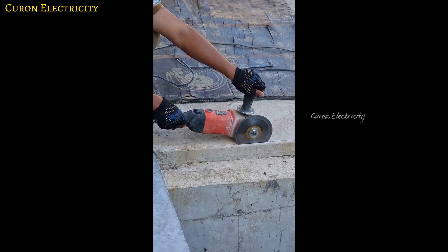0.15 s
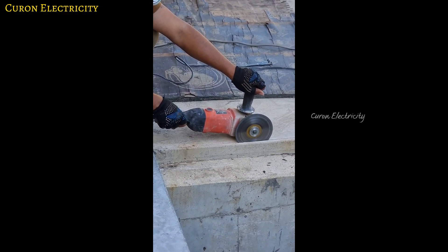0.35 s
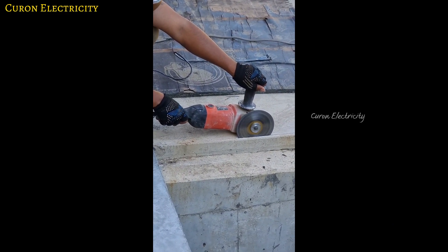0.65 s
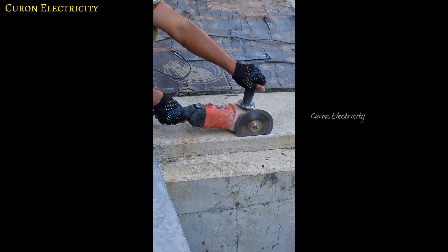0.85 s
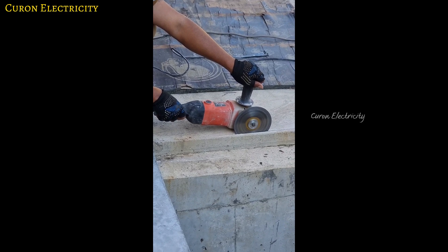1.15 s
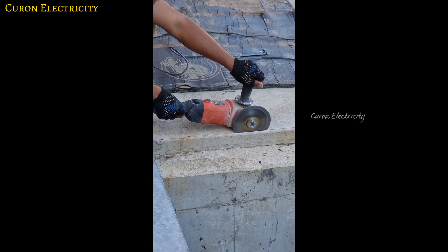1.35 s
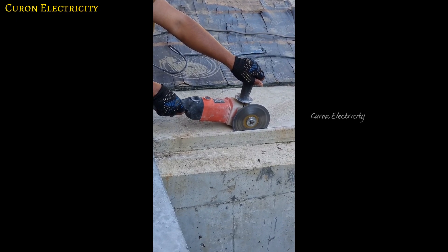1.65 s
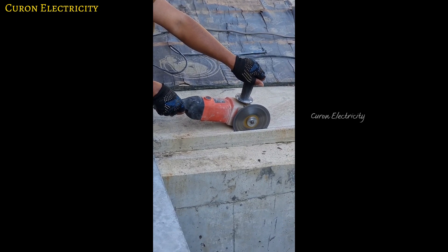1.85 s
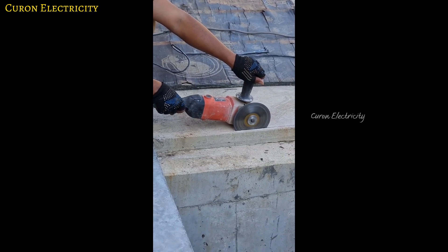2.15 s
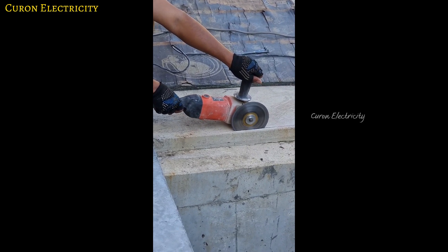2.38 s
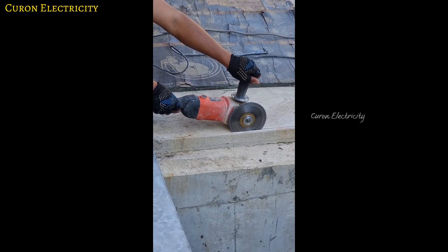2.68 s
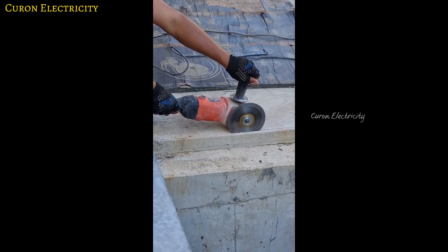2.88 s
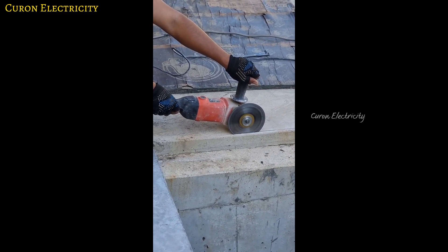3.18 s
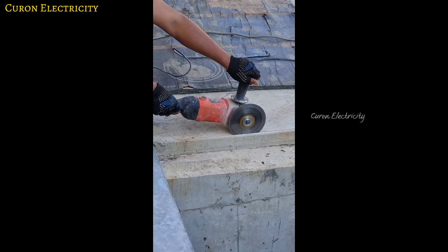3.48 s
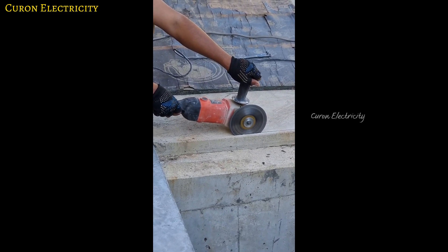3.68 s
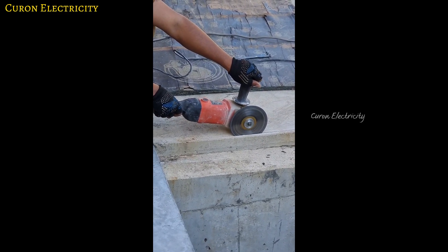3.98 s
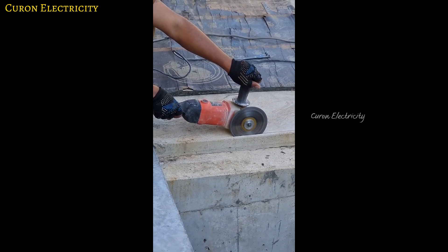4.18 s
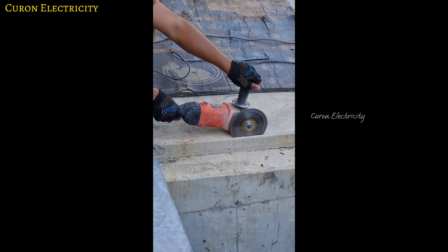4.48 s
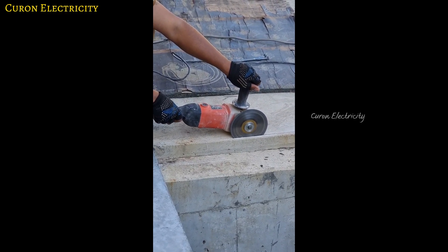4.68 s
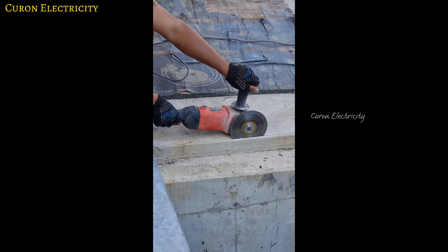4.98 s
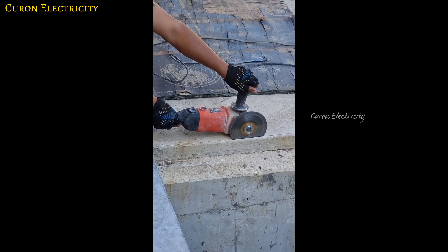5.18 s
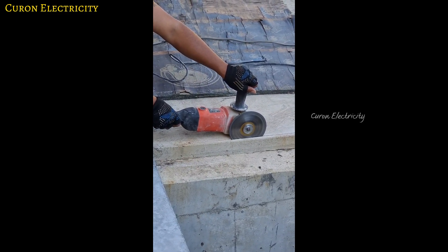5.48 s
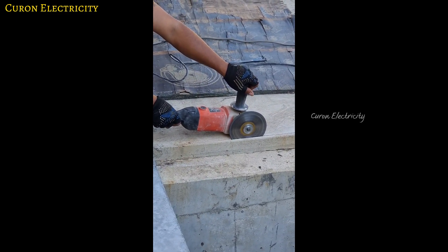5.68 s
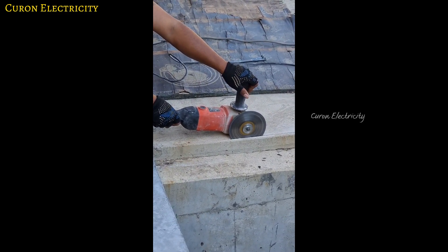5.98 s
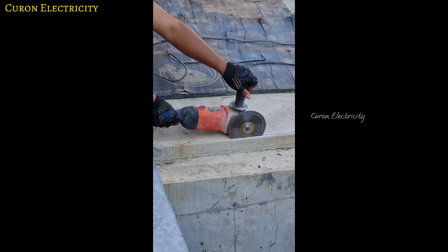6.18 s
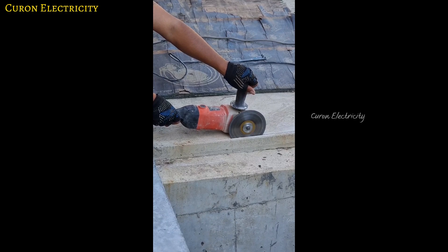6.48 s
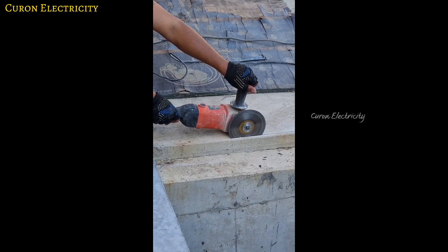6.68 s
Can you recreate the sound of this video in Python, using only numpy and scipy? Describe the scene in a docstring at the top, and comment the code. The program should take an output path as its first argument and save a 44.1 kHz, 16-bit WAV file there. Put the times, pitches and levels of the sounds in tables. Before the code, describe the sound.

A steady, piercing grind of a steel disc on concrete runs from start to end, with rough guard rattle, dull slab scraping and faint motor drone. The rotation sags and recovers a little, ending faster. Thin squeals flick out briefly, mainly in the first half. Close outdoor stereo pickup, short reflections from hard surfaces, light wind with early low thumps, and a quiet distant hum.

```python
"""From the start, an angle grinder cuts a concrete slab outdoors, close to two microphone ports, over wind and hum.
Noise shaped by contact pressure, partly alike on every turn, rings the slab, housing, guard and disc as resonators;
tones locked to the spindle follow its speed. Disc modes sing briefly, and between 1.2 and 2.2 s eddies thump the ports.
Near 4.1 s the treble swings right; meanwhile the hiss sinks and the breeze dies down."""
import sys
import numpy as np
from scipy import signal
from scipy.fft import rfft, irfft
from scipy.io import wavfile
from scipy.ndimage import uniform_filter1d

SR = 44100
rng = np.random.default_rng(int(sys.argv[2]) if len(sys.argv) > 2 else 0)


def wav_out(sig):
    """Save sig, one row per channel (or a flat mono array), as 16-bit PCM at SR to the path in sys.argv[1]."""
    wavfile.write(sys.argv[1], SR, np.round(np.clip(np.atleast_2d(sig).T, -1, 1) * 32767).astype(np.int16))


N = 301644
TIME = np.arange(N) / SR
BINS = np.fft.rfftfreq(N, 1 / SR)
SIDES = np.array([[.5], [-.5]])  # left and right halves of a difference between the ports

# speed of the spindle, which sags under load: (time [s], speed [turns/s])
SPINDLE = [(0, 79), (.22, 79.7), (.45, 84), (.7, 86.4), (.88, 86.2), (1.05, 87.5), (1.6, 89.3), (1.9, 91.8),
           (2.07, 94.6), (2.6, 87.4), (3.05, 87.2), (3.28, 85), (3.5, 88), (3.85, 89.5), (4.15, 88.5),
           (4.46, 85), (4.7, 88), (5.15, 91.6), (5.45, 91.6), (5.8, 96.5), (6.05, 97.6), (6.6, 97.3),
           (6.84, 96)]


def amp(db):
    """The decibel is logarithmic: 20 dB is a factor of ten in amplitude."""
    return 10 ** (np.asarray(db) / 20)


def curve(rows, order=1):
    """Linear interpolation in time of one table column, at every sample."""
    rows = np.asarray(rows)
    return np.interp(TIME, rows[:, 0], rows[:, order])


def spectrum(rows, order=1):
    """Interpolation over log frequency of one table column, at every bin."""
    rows = np.asarray(rows)
    return np.interp(np.log(BINS + 1), np.log(rows[:, 0]), rows[:, order])


def drift(rate_hz):
    """Low-passed Gaussian noise: a smooth complex modulation of power 1, changing about rate_hz times a second."""
    count = 4096
    hz = np.fft.fftfreq(count, N / SR / count)
    noise = rng.standard_normal(count) + 1j * rng.standard_normal(count)
    smooth = np.fft.ifft(np.fft.fft(noise) * np.exp(-(hz / rate_hz) ** 2))
    return np.interp(np.linspace(0, count - 1, N), np.arange(count), smooth / smooth.std())


def step(at_s, time_constant_s):
    """Logistic transition from 0 to 1, half complete at at_s."""
    return .5 + .5 * np.tanh((TIME - at_s) / (2 * time_constant_s))


def swelling(base_db, swells):
    """Addition of powers: the gain of a base level with Gaussian swells on top."""
    power = amp(base_db) ** 2
    for at_s, db, half_s in swells:
        power = power + amp(db) ** 2 * np.exp(-((TIME - at_s) / half_s) ** 2)
    return np.sqrt(power)


def rim_pattern(turns, wear_hz=4.9, count=42):
    """Periodicity: grit meeting the stone every turn gives shaft orders, which change as it wears."""
    turn = np.exp(2j * np.pi * turns)
    wave, pattern = turn ** 4, np.zeros(N)
    for _ in range(count):  # orders 5 to 46
        wave = wave * turn
        pattern += (wave * drift(wear_hz)).real
    return pattern * np.sqrt(4 * curve(SPINDLE) / SR)  # as dense as unit white noise


def bite(turns, wobble=.03, segments=.05, chatter_db=.15, chatter_hz=45.):
    """Modulated contact pressure: a wobble once a turn, strikes of twelve segments, and chatter in the groove."""
    angle = 2 * np.pi * turns
    strikes = np.cos(12 * angle)
    return (1 + wobble * np.cos(angle) + segments * strikes) * amp(chatter_db * drift(chatter_hz).real)


def uptake(pressure, level_db, flutter_db, flutter_hz=32.8):
    """Excitation force: a part takes up the contact pressure unevenly, with a quick flutter."""
    return pressure * amp(level_db + flutter_db * drift(flutter_hz).real)


def ringing(modes):
    """Superposition of modal powers: the response of a set of resonances at the two ports."""
    hz, width, db, side_db, lead = np.transpose(modes)[:, :, None]
    power = amp(db) ** 2 / (1 + (2 * (BINS - hz) / width) ** 2) ** 2
    size = np.sqrt(amp(SIDES * side_db.T) ** 2 @ power)
    mean_lead = np.unwrap(np.angle((power * np.exp(1j * lead)).sum(0)))
    return size * np.exp(1j * SIDES * mean_lead)


def scrape(response, force, pattern, repeat):
    """Source and filter: fresh fractures and a share repeated each turn, coloured by what they shake."""
    # likeness of the sound at the two ports: (frequency [Hz], likeness [0 to 1])
    likeness = [(60, 1), (250, 1), (1300, 0.52), (2400, 1), (3200, 0.95), (4100, 0.83), (5400, 1),
                (6400, 0.2), (7800, 1), (8700, 0.73), (11500, 0), (13200, 0.65), (15700, 0.4)]
    fresh, stray = rfft(rng.standard_normal((2, N)) * force)
    share = np.clip(repeat, 0, 1) / (1 + (BINS / 3600) ** 8)  # the repetition is lost in the treble
    common = np.sqrt(1 - share) * fresh + np.sqrt(share) * rfft(pattern * force)
    same = np.clip(spectrum(likeness), 0, 1)
    alike = np.sqrt((1 + same) / 2) * common
    unlike = 2 * SIDES * np.sqrt((1 - same) / 2) * stray
    return irfft(response * (alike + unlike), N)


def vents(pattern):
    """Turbulent flow: air rushes steadily through the motor's vents."""
    # response of the vents: (frequency [Hz], gain before the force of 0.98 [dB])
    rush = [(20, -50), (55, -21.5), (120, -31.5), (200, -28), (320, -32.5), (420, -33), (530, -29.5),
            (680, -40), (1200, -58), (3000, -68)]
    return scrape(amp(spectrum(rush)), 0.98, pattern, repeat=0.085)


def slab(pattern, pressure, feed_db, follows=1.17):
    """Forced vibration: harder feed brings louder dull scraping of the slab."""
    # response of the slab: (frequency [Hz], gain before the force [dB])
    dull = [(400, -42), (760, -40.5), (920, -32.5), (1070, -33), (1300, -29.5), (1700, -29.5), (2700, -41),
            (3400, -71), (16000, -72)]
    return scrape(amp(spectrum(dull)), uptake(pressure, follows * feed_db, flutter_db=3.5), pattern, repeat=0.13)


def housing(pattern, pressure, feed_db, follows=0.69):
    """Modal resonance: snags on hard stones jolt the two lowest modes, while the feed drives the others."""
    # modes: (frequency [Hz], width at half amplitude [Hz], gain before the force [dB],
    # left over right [dB], lead of left [rad])
    modes = [(932, 113, -33, 1, 0.13), (990, 87, -39, -5, 0.13), (1586, 193, -15.5, -2.5, 0.88),
             (2017, 490, -19.5, 7, 0.2)]
    # snags of the rim: (time [s], jolt added to a steady 0 dB by power [dB], half length at 1/e power [s])
    snags = [(.08, 7, .13), (.6, 8, .07), (1.6, 4, .06), (2.3, 10, .07), (3.06, 11, .05), (3.19, 13, .04),
             (3.28, 16, .035), (3.6, 6, .12), (4.95, 3, .12)]
    low = scrape(ringing(modes[:2]), pressure * swelling(0, snags), pattern, repeat=0.22)
    force = uptake(pressure, follows * feed_db, flutter_db=2.5)
    return low + scrape(ringing(modes[2:]), force, pattern, repeat=0.23)


def flexing(x, share=.002, flex_hz=12.):
    """Frequency modulation: a part flexes under the hand, so its resonances wander by a small share."""
    at = np.arange(N)
    stray = share * drift(flex_hz).real
    path = at + np.cumsum(stray - stray.mean())
    return np.array([np.interp(path, at, port) for port in x])


def guard(pattern, pressure):
    """Modal resonance: the cut shakes the guard, whose close modes wander in pitch."""
    # modes: (frequency [Hz], width at half amplitude [Hz], gain before the force [dB],
    # left over right [dB], lead of left [rad])
    modes = [(2242, 116, -6.5, 0.4, 0.16), (2297, 168, -3.5, 0.4, 0.12), (2474, 260, -10.5, 0, 0.07)]
    # how strongly the cut shakes the guard: (time [s], level before flutter [dB])
    rattle = [(0, 3.3), (0.25, 3.2), (0.55, 1.3), (0.9, 2.1), (1.1, 1.1), (1.3, 2.2), (1.55, 0.5),
              (2.0, 2.9), (2.3, 1.5), (2.6, -0.5), (2.8, 2.3), (3.2, 2.0), (3.4, 0.4), (3.7, 1.0),
              (4.15, 0.7), (4.45, -1.7), (4.7, -1.9), (5.05, -4.1), (5.45, -1.3), (5.75, -1.8), (6.1, -1.5),
              (6.25, -2.6), (6.5, -0.3), (6.84, 0.3)]
    force = uptake(pressure, curve(rattle), flutter_db=1.37, flutter_hz=70.)
    return flexing(scrape(ringing(modes), force, pattern, repeat=0.3))


def grit_hiss(pattern, pressure, start_db=2.5, fade_db_per_s=0.99):
    """Fracture noise: breaking grit hisses over a broad band and sinks as the groove deepens."""
    # response of the hiss: (frequency [Hz], gain before the force [dB], left over right [dB])
    hiss = [(1400, -45, 0), (2400, -20, 0.3), (3000, -18.5, 0.7), (3450, -23.9, 0.8), (4600, -20, 2.2),
            (5600, -21.7, -2.3), (7000, -17.2, -0.8), (8500, -17.3, 4.0), (11100, -17.0, 2.4),
            (12500, -16.4, 2.9), (15750, -16.5, -4.8)]
    # phase between the ports: (frequency [Hz], lead of left [rad])
    leads = [(2500, 0.78), (3600, 1.7), (4300, 1.07), (5200, 19.7), (6400, 3.9), (7900, 23.2), (9000, 12.7),
             (11000, 12.2), (11800, 5.2), (12900, 6.3), (14400, 11), (15400, 6.4)]
    size = amp(spectrum(hiss) + SIDES * spectrum(hiss, order=2))
    response = size * np.exp(1j * SIDES * spectrum(leads))
    force = uptake(pressure, start_db - fade_db_per_s * TIME, flutter_db=2.5)
    return scrape(response, force, pattern, repeat=0.067)


def bearing_db(way):
    """Addition of powers: a constant light touch in one way, plus the spells of bearing harder."""
    # light touch before the disc's overall gain: (way: level [dB])
    light_touch = {"edge": -13, "free": -15, "flank": -10.5, "pinch": -15.5}
    # spells: (start [s], end [s], level before the disc's overall gain [dB],
    # time constant of the changeover [s], way)
    spells = [(-.5, 0.75, -5.5, .15, "free"), (-.5, .28, -5, .12, "flank"), (.18, 2.35, .3, 0.12, "edge"),
              (1.95, 2.14, -7, .06, "pinch"), (2.06, 4.85, -6, .12, "flank"),
              (2.44, 2.58, -3.5, .05, "flank"), (2.73, 3.74, 0.4, .12, "free"),
              (3.92, 4.88, -6, .1, "pinch"), (3.65, 4.4, -4.5, .11, "flank"),
              (4.85, 6.6, -0.1, 0.12, "pinch"), (6.58, 7.3, -5, 0.08, "flank"),
              (6.6, 7.3, -7, .08, "pinch")]
    power = amp(light_touch[way]) ** 2
    for start, end, db, change, kind in spells:
        if kind == way:
            power = power + amp(db) ** 2 * step(start, change) * (1 - step(end, change))
    return 10 * np.log10(power)


def disc(pattern, pressure, level_db=0.24):
    """Modal excitation: where the disc touches the groove decides which of its modes are fed."""
    # modes of the steel disc: (frequency [Hz], width at half amplitude [Hz], left over right [dB],
    # lead of left [rad], then gains before the force: on the leading edge [dB], free running [dB],
    # on the flank [dB], pinched [dB])
    modes = np.array([(2457, 380, -3.5, -0.1, -11.5, -18, -21, -18),
                      (3300, 160, 0.5, 2.3, -17.5, -20.0, -23.5, -24.5),
                      (3690, 260, 2.0, 2.9, -17.5, -15.0, -18.5, -22.0),
                      (3960, 210, 2.5, 2.8, -13.5, -14.0, -14.0, -19.0),
                      (4290, 170, 1.5, -2.8, -14.5, -11.5, -11.5, -15.0),
                      (4810, 170, -1.5, -1.2, -20.0, -16.0, -15.0, -15.0),
                      (5020, 190, -3.5, -0.2, -20.0, -14.0, -12.5, -16.0),
                      (5240, 160, 1.5, -0.0, -11.5, -15.0, -15.0, -15.0),
                      (5590, 480, 0.5, 0.1, -13.0, -28.5, -23.0, -11.5),
                      (5920, 170, -4.5, 0.9, -11.5, -14.5, -23.0, -10.0),
                      (6080, 180, -2.0, 1.6, -12.5, -6.0, -17.0, -14.5),
                      (6280, 440, 4.5, 1.1, -12.0, -10.0, -11.5, -10.5),
                      (6680, 170, -1.5, 0.5, -4.0, -7.0, -10.0, -4.5),
                      (7000, 240, -0.5, 1.1, -6.5, -12.0, -9.0, -10.5),
                      (7160, 310, -0.5, 1.1, -12.0, -7.5, -9.5, -15.5),
                      (7540, 200, 0.0, 1.9, -13.0, -7.0, -11.0, -10.0),
                      (7910, 240, 3.0, 1.8, -13.5, -13.0, -7.5, -12.0),
                      (8120, 220, 6.0, 2.1, -8.5, -18.0, -9.0, -7.5),
                      (8590, 130, 4.5, -1.7, -17.0, -9.5, -17.0, -13.5),
                      (9080, 290, 6.0, 0.1, -12.5, -14.0, -7.5, -15.5),
                      (9330, 140, 5.0, 0.7, -16.0, -13.5, -10.0, -13.0),
                      (9700, 490, 3.5, 1.0, -16.5, -13.0, -13.5, -11.0),
                      (10070, 280, 4.5, 1.9, -17.0, -20.5, -20.0, -16.5),
                      (10480, 240, 3.0, -0.5, -10.5, -9.0, -10.0, -15.0),
                      (10810, 240, 2.0, -0.0, -14.0, -16.5, -15.0, -17.0),
                      (11440, 280, 3.0, -2.6, -13.5, -12.0, -11.5, -11.0),
                      (11900, 270, 1.5, -2.5, -16.0, -16.5, -7.5, -9.5),
                      (12340, 280, -1.0, -1.3, -8.5, -10.0, -7.0, -7.0),
                      (12750, 500, -2.5, -0.6, -11.0, -13.0, -3.5, -10.5),
                      (12960, 220, -3.5, -0.5, -3.5, -11.0, -4.5, -2.0),
                      (13540, 300, -1.5, -0.3, -10.5, -9.5, -5.5, -11.5),
                      (13950, 180, -4.5, -0.2, -5.5, -6.0, -1.0, -7.5),
                      (14490, 240, -2.5, 0.3, -7.0, -8.0, -1.5, -6.5),
                      (15030, 170, -1.5, 1.4, -11.0, -8.5, -7.5, -11.0),
                      (15470, 220, -2.5, 2.2, -12.5, -13.0, -11.5, -10.0),
                      (15700, 210, -2.0, 2.3, -8.5, -5.0, -3.0, -13.0)])
    out = np.zeros((2, N))
    for k, way in enumerate(("edge", "free", "flank", "pinch")):
        fed = np.c_[modes[:, :2], modes[:, 4 + k], modes[:, 2:4]]
        force = uptake(pressure, level_db + bearing_db(way), flutter_db=1.03)
        out += scrape(ringing(fed), force, pattern, repeat=0)
    return out


def shifting(x, patch_db=1.2, size=2048):
    """Time-varying filtering: as the contact creeps round the rim, small time-frequency patches of the sound
    swell and fade at random, neighbouring bands alike."""
    bands = signal.stft(x, nperseg=size)[2]
    field = rng.standard_normal(bands.shape[1:])
    for _ in range(2):  # smooth over frequency, then time
        field = uniform_filter1d(uniform_filter1d(field, size=5, axis=0), size=3, axis=1)
    gain = amp(patch_db * field / field.std())
    return signal.istft(bands * gain / np.sqrt(np.mean(gain ** 2)), nperseg=size)[1][:, :N]


def cutting(turns):
    """Common excitation: one contact drives slab, housing, guard, grit and disc, while the vents rush on."""
    # how hard the disc is fed into the slab: (time [s], level before each part's share [dB])
    feed = [(0, 2), (.65, 2.5), (.85, -1), (1.55, 1.5), (1.85, -0.5), (2.2, 2.5), (2.7, 3.5), (3.2, 6.5),
            (3.5, 2), (3.75, 4.5), (4.05, -0.5), (4.5, -1), (4.95, 1), (5.25, -2), (5.7, -2.5), (6.15, -5),
            (6.63, .5), (6.84, -1.5)]
    pattern, pressure, feed_db = rim_pattern(turns), bite(turns), curve(feed)
    body = vents(pattern) + slab(pattern, pressure, feed_db)
    body += housing(pattern, pressure, feed_db) + guard(pattern, pressure)
    return body + shifting(grit_hiss(pattern, pressure) + disc(pattern, pressure))


def walls(x, count=8, echo_db=-6, sway_samples=3, sway_hz=1.2):
    """Comb filtering: echoes from slab and walls ripple the spectrum; their paths shift as the tool sways."""
    at, out = np.arange(N), x.copy()
    for side in range(2):
        delays_s = rng.uniform(.004, .03, count)
        for delay_s, sign in zip(delays_s, rng.choice([-1, 1], count)):
            path = delay_s * SR + sway_samples * drift(sway_hz).real
            out[side] += sign * amp(echo_db) / np.sqrt(count) * np.interp(at - path, at, x[side], left=0)
    return out / np.sqrt(1 + amp(echo_db) ** 2)  # keeps the power


def shaft(turns, waver=.48):
    """Rotating machinery: unbalance, gear and a rotor 3.75 times as fast give tones locked to the spindle."""
    # drone at three times the spindle's speed: (time [s], level [dB])
    drone = [(0, -62), (.6, -54), (.8, -44.5), (1.1, -49), (1.44, -37.5), (1.7, -52), (1.85, -49),
             (1.99, -46), (2.1, -63), (2.4, -60), (2.55, -49.5), (3.15, -53.5), (3.3, -58), (3.6, -54.5),
             (4.9, -60), (5.37, -52), (5.6, -58), (6.84, -65)]
    # swells at twice the speed: (time [s], level [dB], half length at 1/e power [s])
    swells = [(0.288, -53, 0.06), (0.748, -49, 0.064), (2.636, -44.5, 0.084), (3.742, -50, .1),
              (5.198, -52.5, 0.068), (5.65, -51, 0.2), (6.03, -43.5, 0.094), (6.398, -43.5, 0.068)]
    # gear whine at ten times the speed, under heavy load: (time [s], level [dB], half length at 1/e power [s])
    whines = [(2.318, -46, 0.088), (2.98, -52, 0.12)]
    gains = {1: amp(-53.5), 2: swelling(-56, swells), 3: amp(curve(drone)),
             6: amp(-69), 10: swelling(-77.0, whines), 3.75: amp(-61.5)}  # order: RMS gain
    tones = np.zeros(N)
    for order, gain in gains.items():
        tones += gain * (np.exp(2j * np.pi * order * turns) * (1 + waver * drift(12.5))).real
    return tones * np.sqrt(2 / (1 + waver ** 2))


def wind(side_db=5.5, shared=0.75, breeze_db=-39.5, fade_db_per_s=3):
    """Turbulence: partly shared low noise, a lumpy fading breeze with gusts, stronger on the left port."""
    # shape of the rumble: (frequency [Hz], level before normalising [dB])
    rumble = [(15, -26), (32, -12), (48, 1), (70, 0.5), (105, -3), (160, -10), (300, -13.5), (600, -27.5),
              (2000, -80)]
    # gusts on the ports: (time [s], level before buffeting and balance [dB], half length at 1/e power [s])
    gusts = [(.01, -41, 0.041), (.6, -48, .3), (.88, -43, 0.053), (1.22, -39.5, .08), (1.436, -32, 0.034),
             (1.53, -37.5, 0.1), (1.7, -43.5, 0.6), (2.136, -37, .04), (2.267, -39.5, 0.069),
             (2.464, -40, 0.034), (5.25, -50, .08), (5.65, -46, .12), (6.155, -43, .074)]
    buffet_db = 1.5 * drift(8.).real
    white = rng.standard_normal((2, N)) + shared * rng.standard_normal(N)
    air = irfft(rfft(white) * amp(spectrum(rumble)), N)
    gain = swelling(breeze_db - fade_db_per_s * TIME, gusts)
    return air / air.std() * gain * amp(SIDES * side_db + buffet_db)


def hum(hz=53, level_db=-45, waver=0.05):
    """Periodic source: a low, almost steady sine, as of a generator some way off."""
    return np.sqrt(2) * amp(level_db) * (np.exp(2j * np.pi * hz * TIME) * (1 + waver * drift(3.4))).real


def squeals(line_hz=45., side_db=-10.0):
    """Self-excited vibration: the groove catches the disc and one mode sings as a narrow, unsteady tone."""
    # squeals: (time [s], frequency [Hz], level before balance [dB], half length at 1/e power [s])
    calls = [(0.06, 14070, -26, 0.086), (0.41, 6620, -29, 0.07), (.68, 5720, -32, .06),
             (0.92, 6700, -29, 0.07), (1.94, 6743, -27, 0.12), (2.06, 13877, -30, 0.06),
             (2.1, 9520, -29, .06), (2.35, 8250, -31, .05), (2.6, 13300, -28, .06),
             (2.75, 14505, -23, 0.09), (2.82, 15030, -29, .06), (3.08, 6078, -29, 0.09),
             (3.94, 13945, -28, 0.157), (4.05, 14477, -27, 0.2), (4.95, 13968, -28, 0.078)]
    tones = np.zeros(N)
    for at_s, hz, db, half_s in calls:
        swell = amp(db) * np.exp(-.5 * ((TIME - at_s) / half_s) ** 2)
        tones += swell * (np.exp(2j * np.pi * hz * TIME) * drift(line_hz)).real
    return np.sqrt(2) * tones * amp(SIDES * side_db)


def thumps(level_db=-1.0, half_s=0.014):
    """Pressure pulses: an eddy pushes and pulls on the ports for a cycle or two."""
    # thumps: (time [s], level before level_db and balance [dB], frequency [Hz], left over right [dB])
    eddies = [(1.219, -29, 51.1, -0.5), (1.329, -26, 70.0, 9), (1.399, -29, 59.2, 9.5),
              (1.549, -26, 61.9, 3.0), (2.049, -33, 83.4, 12), (2.133, -28, 56.5, 10)]
    out = np.zeros((2, N))
    for at_s, db, hz, side_db in eddies:
        pulse = np.exp(-((TIME - at_s) / half_s) ** 2) * np.sin(2 * np.pi * hz * (TIME - at_s))
        out += amp(level_db + db + SIDES * side_db) * pulse
    return out


def beaming(x, low_hz=3100.0, high_hz=6300.0, turn_s=4.1, time_constant_s=.17, from_db=0, to_db=-4):
    """Directivity: the disc beams its treble, which swings toward the right port as the tool turns."""
    treble = irfft(rfft(x) * np.clip((BINS - low_hz) / (high_hz - low_hz), 0, 1), N)
    balance_db = from_db + (to_db - from_db) * step(turn_s, time_constant_s)
    return x + treble * (amp(SIDES * balance_db) - 1)


def scene():
    """Superposition: the grinder with its echoes and shaft tones, over the wind, thumps and hum."""
    turns = np.cumsum(curve(SPINDLE)) / SR
    grinder = walls(beaming(cutting(turns) + squeals()))
    return grinder + shaft(turns) + wind() + thumps() + hum()


def record(dry, edge_hz=15760):
    """Band limitation: the recorder's steep low-pass filter."""
    lowpass = signal.firwin(1023, edge_hz, window=("kaiser", 9), fs=SR)
    return signal.oaconvolve(dry, lowpass[None], "same")


dry = scene()
out = record(dry)
wav_out(out)
```